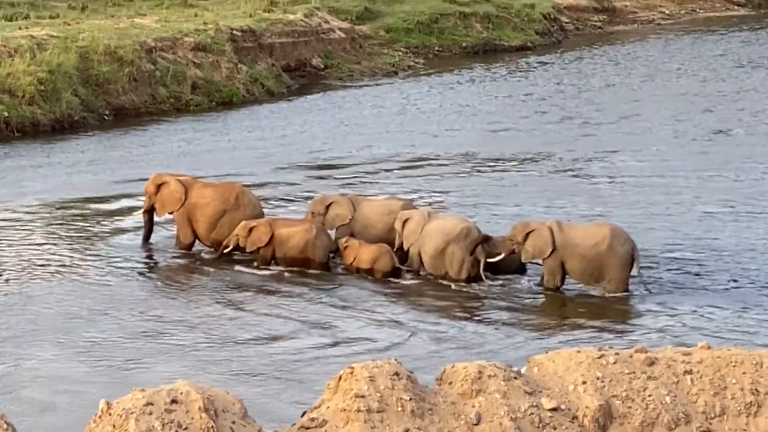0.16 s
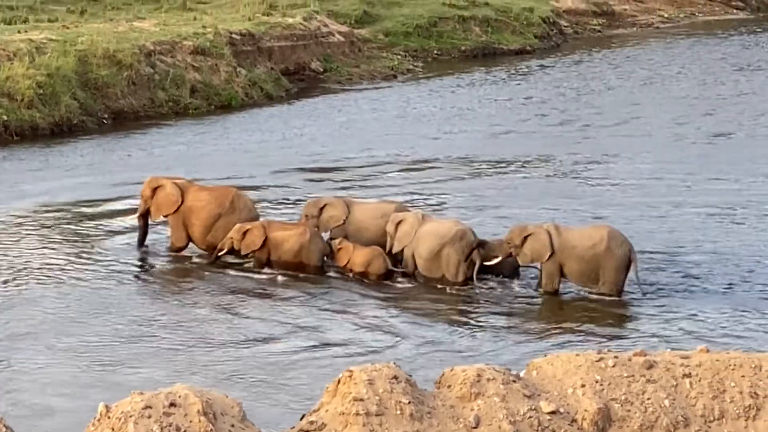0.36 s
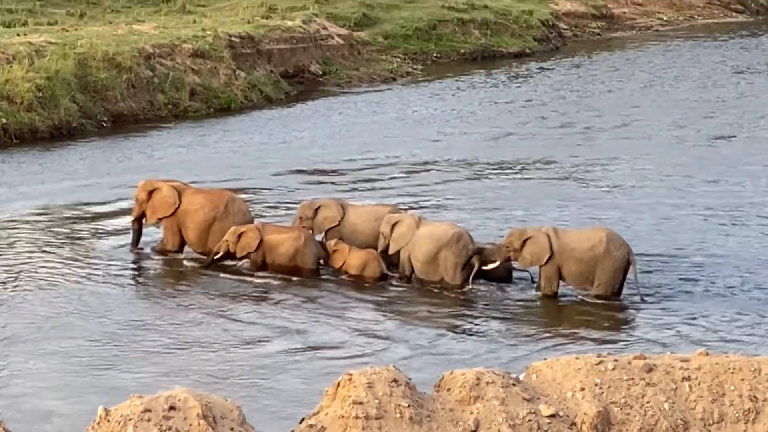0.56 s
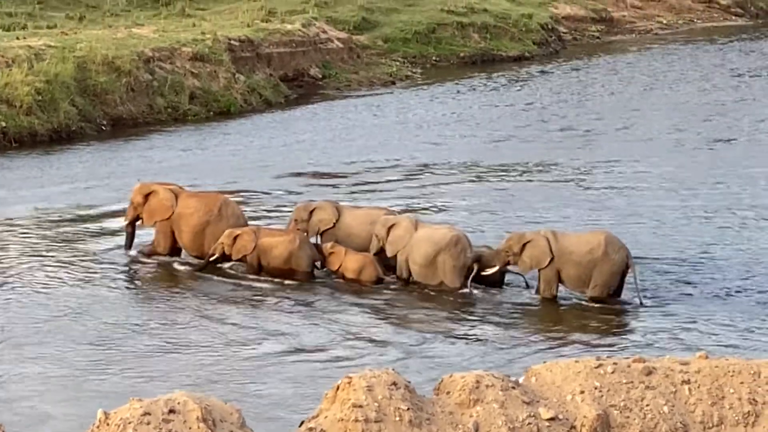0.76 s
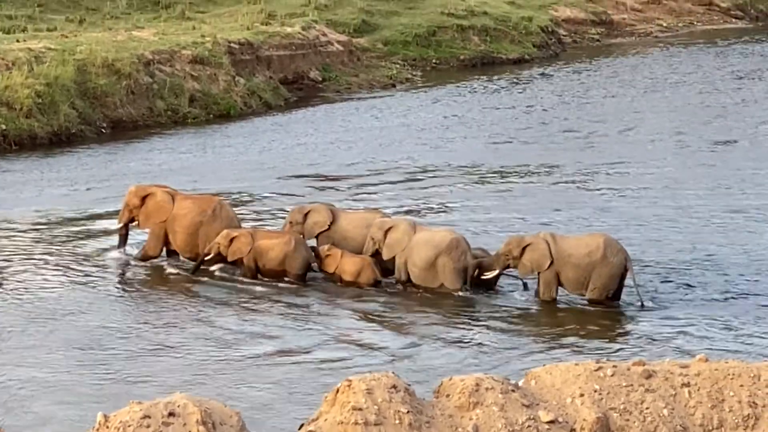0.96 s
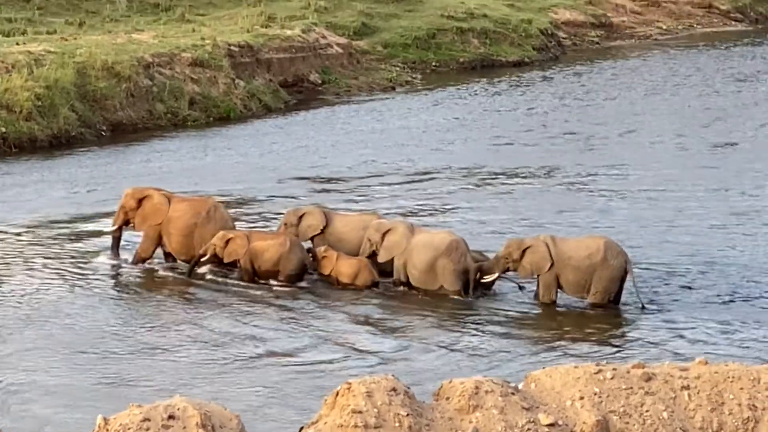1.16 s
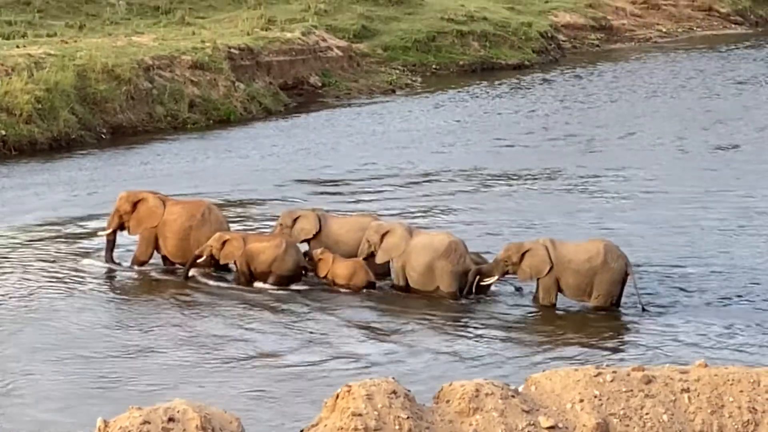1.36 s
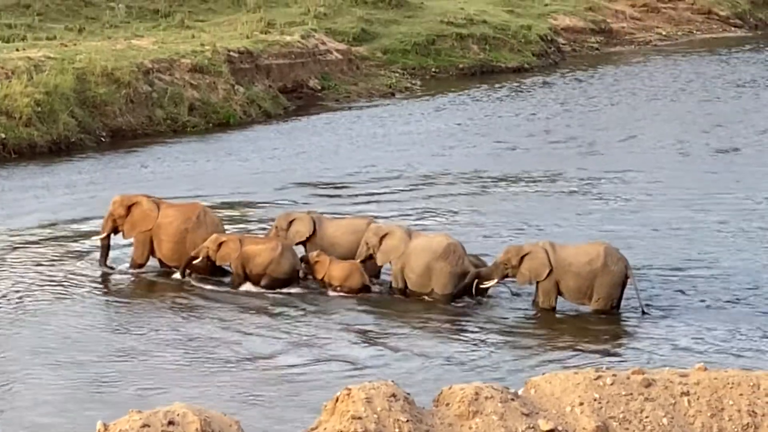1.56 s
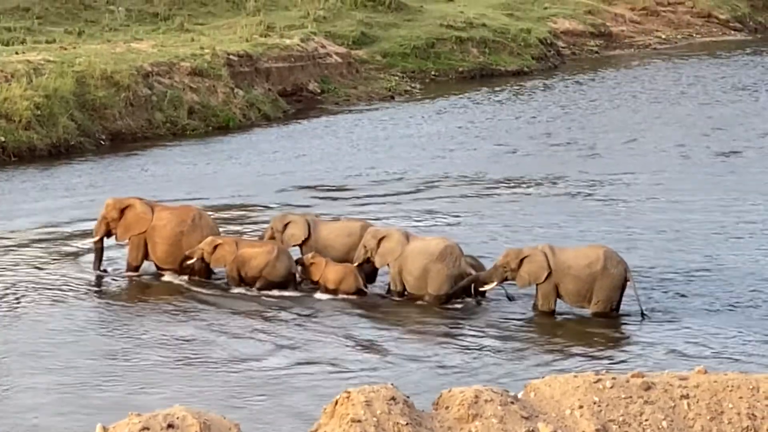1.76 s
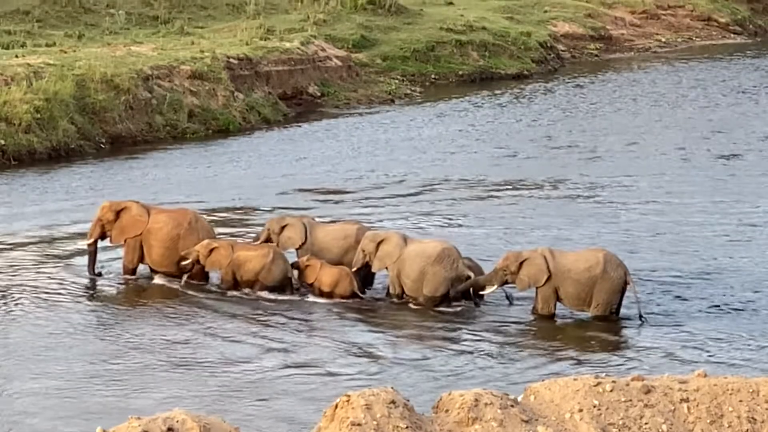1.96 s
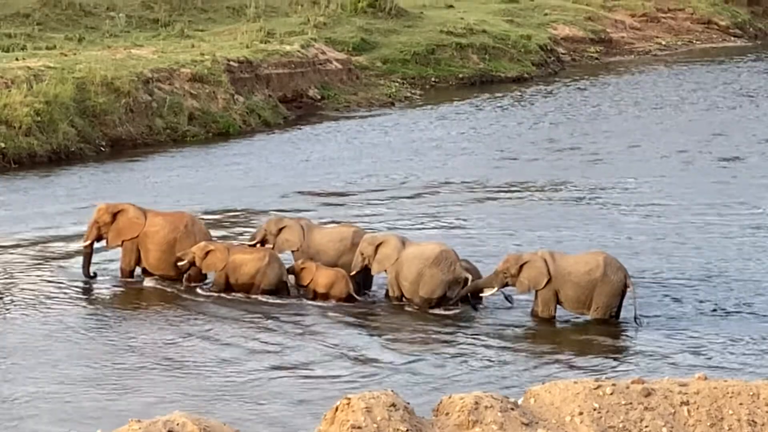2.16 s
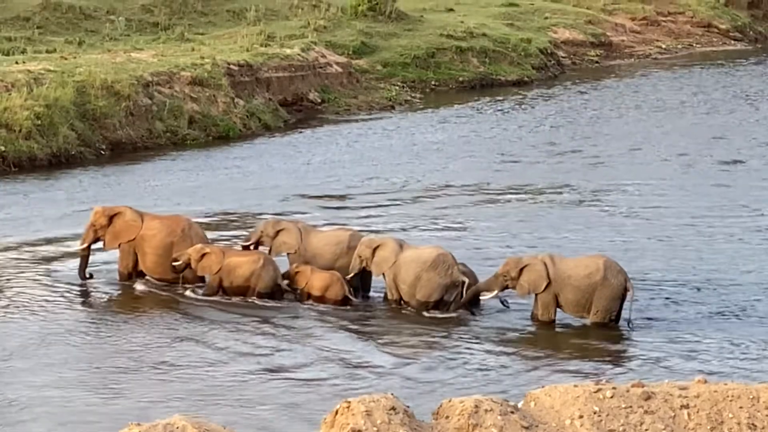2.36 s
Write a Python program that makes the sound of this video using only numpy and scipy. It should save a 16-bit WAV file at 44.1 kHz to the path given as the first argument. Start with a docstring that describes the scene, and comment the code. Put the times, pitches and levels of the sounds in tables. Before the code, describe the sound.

Deep, uneven wind gusts thump and rumble on the microphone, strongest early then weakening, while one bird repeats a short rising whistle and others chirp and trill over soft river hiss and thin insect tones outdoors.

```python
"""A river hisses under thin, steady insect tones and one short bird note; then wind buffets the microphone.
The river is coloured noise; the insects are wavering sines over a band of hiss; rustles, ticks and a snap
are bright noise close by. One bird repeats a rising whistle, others add a slur, short notes and a trill,
all gliding sines with a short echo. The wind grunts in deep noise bursts, broad buffets and sharp single eddies."""
import sys
import numpy as np
from scipy import signal
from scipy.fft import rfft, irfft
from scipy.io import wavfile
from scipy.ndimage import uniform_filter1d

SR = 44100
rng = np.random.default_rng(int(sys.argv[2]) if len(sys.argv) > 2 else 0)


def output_pcm(signal):
    """Save a mono or channel-first signal as 16-bit PCM at the path in sys.argv[1].

    Samples are clipped to [-1, 1] before scaling.
    """
    pcm = np.clip(np.atleast_2d(signal).T, -1, 1) * 32767
    wavfile.write(sys.argv[1], SR, np.round(pcm).astype(np.int16))


N = 105840  # samples, 2.4 s


def amp(db):
    """Turn decibels into a linear gain."""
    return 10 ** (np.asarray(db) / 20)


def rms_one(x):
    """Scale a signal to an rms of 1."""
    return x / np.sqrt(np.mean(x ** 2) + 1e-20)


def in_time(rows, start=0):
    """Draw straight lines through the rows: one curve per column, the first column being seconds after start."""
    seconds, *columns = np.transpose(rows)
    t = np.arange(N) / SR - start
    return [np.interp(t, seconds, column) for column in columns]


def band(x, low_hz, high_hz, order=2):
    """Keep only the band between two edges."""
    edges = [low_hz, min(high_hz, .45 * SR)]
    return signal.sosfilt(signal.butter(order, edges, "band", fs=SR, output="sos"), x)


def low_pass(hz, order=2):
    """Design a filter that keeps what lies below hz."""
    return signal.butter(order, hz, fs=SR, output="sos")


def drift(corner_hz):
    """Random wandering of rms 1: white noise through two equal one-pole low-passes."""
    r = np.exp(-2 * np.pi * corner_hz / SR)
    wander = signal.lfilter([1], [1, -2 * r, r * r], rng.standard_normal(N + SR))
    return rms_one(wander[SR:])  # the first second lets the filter settle


def coloured(spectrum, patchy_db):
    """Noise shaped to a spectrum and set to rms 1, made to flicker in level."""
    hz, db = np.transpose(spectrum)
    bin_hz = np.arange(N // 2 + 1) * SR / N
    gain = amp(np.interp(np.log(bin_hz + 1), np.log(hz), db))
    flicker = amp(patchy_db * drift(8.6))
    return flicker * rms_one(irfft(gain * rfft(rng.standard_normal(N)), N))


def tone(hz, db):
    """A sine that follows a pitch curve, at an rms level in dB."""
    phase = 2 * np.pi * np.cumsum(hz) / SR
    return np.sqrt(2) * amp(db) * np.sin(phase)


def spell(start, length, edge):
    """A swell from nothing to 1 and back, and the share of the way through it."""
    u = np.clip((np.arange(N) / SR - start) / length, 0, 1)
    return np.abs(np.sin(np.pi * u)) ** edge * (u > 0) * (u < 1), u


def evened(x, span_s=.0495):
    """Divide a signal by its own running rms, so that its level stays near 1."""
    return x / np.sqrt(uniform_filter1d(x ** 2, int(span_s * SR)) + 1e-12)


def burst(start, db, t60, low_hz, top_hz=12500):
    """A puff of noise that falls 60 dB in t60 seconds, then passes a band filter."""
    out, i = np.zeros(N), int(start * SR)
    n = min(SR // 20, N - i)
    t = np.arange(SR // 20) / SR
    puff = rng.standard_normal(SR // 20) * amp(db - 60 * t / t60)
    out[i:i + n] = band(puff, low_hz, top_hz)[:n]
    return out


# Colour of the water's hiss. Each row: frequency in Hz, relative density in dB per Hz.
RIVER_COLOUR = [(120, -32), (200, -5), (400, -10), (550, -6.5), (850, -8), (1300, -7), (1950, -4),
                (2700, -10), (3100, -13.5), (3900, -16.5), (5800, -30), (7500, -31.5), (11500, -35),
                (13000, -42.5), (15000, -34.5)]
RIVER_DB, RIVER_PATCHY_DB = -47.5, 1.62  # level, depth of flicker


def river():
    """The steady hiss of water: coloured noise with a slight flicker in level."""
    return amp(RIVER_DB) * coloured(RIVER_COLOUR, RIVER_PATCHY_DB)


# Thin insect tones. Each row: pitch in Hz, rms level in dB around which it wavers.
DRONES = [(1733.3, -61), (1974, -54.5), (2214.3, -63.5)]
# Swell of the far chorus. Each row: time in seconds, level in dB.
CHORUS_SWELL = [(0, -58.5), (1.2, -58.5), (1.5, -54.5), (1.97, -60.5)]
CHORUS_LOW_HZ, CHORUS_TOP_HZ = 4034, 4940
DRONE_WAVER_DB, DRONE_WAVER_HZ = 1.5, 8  # depth, corner of the random waver


def insects():
    """Sines at fixed pitch that waver in level, over far insects blurred into a band of hiss."""
    level_db, = in_time(CHORUS_SWELL)
    hiss = band(rng.standard_normal(N), CHORUS_LOW_HZ, CHORUS_TOP_HZ, order=3)
    out = amp(level_db) * rms_one(hiss)
    for hz, db in DRONES:
        out += tone(np.full(N, hz), db + DRONE_WAVER_DB * drift(DRONE_WAVER_HZ))
    return out


# Spells of high rustle. Each row: start in seconds, length in seconds, level in dB.
RUSTLES = [(0, 0.11, -64), (0.45, 0.019, -64), (0.861, 0.063, -56), (1.18, 0.046, -61.5),
           (1.782, 0.12, -62.5), (2.381, 0.015, -64)]
# Colour of the rustle. Each row: frequency in Hz, relative density in dB per Hz.
RUSTLE_SPECTRUM = [(5500, -36), (8000, -6), (11500, -3.5), (13000, -24), (14800, -6)]
# Small ticks. Each row: start in seconds, noise level at the onset in dB before the band filter.
TICK_ONSETS = [(.6804, -50), (1.2027, -51), (1.2825, -53), (1.3633, -52)]
# One broad snap, a single row: start in seconds, onset level in dB before the band filter,
# 60 dB decay in seconds, low band edge in Hz.
BROAD_SNAP = (.9668, -33.5, .022, 1600)
TICK_T60_S, TICK_LOW_HZ = .012, 7500


def rustle():
    """High rustle close by from swelling coloured noise, with ticks and one snap from fast-dying puffs."""
    level = sum(amp(db) * spell(start, length, .45)[0] for start, length, db in RUSTLES)
    ticks = sum(burst(start, db, TICK_T60_S, TICK_LOW_HZ) for start, db in TICK_ONSETS)
    return level * coloured(RUSTLE_SPECTRUM, patchy_db=2.5) + ticks + burst(*BROAD_SNAP)


# The repeated whistle. Each row: start in seconds, level in dB added to the shape, stretch in time as a factor.
WHISTLE_CALLS = [(0.58, -37.5, 0.95), (1.364, -40, 1.03), (2.147, -43, 1.08)]
# Shape of one whistle. Each row: seconds after the start before stretching, pitch in Hz, relative level in dB.
WHISTLE_SHAPE = [(0, 1782, -29), (0.012, 1756, -8.5), (.05, 1785, -11.5), (0.068, 1803, 0.5),
                 (0.165, 1885, 0.5), (0.19, 1950, -0.5), (.198, 1960, -47), (0.208, 1802, -10.5),
                 (0.25, 1735, -11.5), (.29, 1824, -20)]


def whistles():
    """One bird's rising whistle: a sine that climbs, breaks off and drops to a short lower ending."""
    t, out = np.arange(N) / SR, np.zeros(N)
    for start, db, stretch in WHISTLE_CALLS:
        hz, shape_db = in_time(np.multiply(WHISTLE_SHAPE, [stretch, 1, 1]), start)
        sounding = (t > start) * (t < start + stretch * WHISTLE_SHAPE[-1][0])
        out += tone(hz, shape_db + db) * sounding
    return out


NOTE_ROUGH = .3  # depth of the random level roughness, as a share of the note
# A second bird's falling slur into a held note. Each row: time in seconds, pitch in Hz, level in dB.
FALLING_SLUR = [(1.085, 3150, -54), (1.135, 3130, -60), (1.15, 2950, -50), (1.175, 2700, -55.5),
                (1.196, 2576, -42), (1.232, 2548, -38), (1.246, 2508, -40), (1.308, 2538, -38.5),
                (1.335, 2544, -54)]


def slur():
    """A second bird: a sine slides down into a held note, its level roughened."""
    t = np.arange(N) / SR
    sounding = (t > FALLING_SLUR[0][0]) * (t < FALLING_SLUR[-1][0])
    return tone(*in_time(FALLING_SLUR)) * (1 + NOTE_ROUGH * drift(56)) * sounding


# Short notes of further birds. Each row: start in seconds, length in seconds, first, middle and last pitch in Hz,
# level in dB, random pitch blur in Hz.
SHORT_NOTES = [(0, 0.036, 1930, 1910, 1860, -46, 72), (0.396, 0.038, 4750, 4970, 4780, -57.5, 20),
               (.69, .047, 4900, 5100, 5200, -61, 30), (0.785, 0.022, 4800, 5300, 5130, -54, 10),
               (0.805, 0.027, 5130, 5430, 4700, -52, 10), (0.878, 0.05, 4750, 5380, 5150, -54, 25),
               (1.645, .036, 3720, 3730, 3700, -50.5, 14), (1.69, 0.036, 3660, 3410, 3600, -45, 10),
               (1.742, 0.034, 3600, 3330, 3330, -44, 10), (1.79, 0.04, 3560, 3230, 3400, -49, 25),
               (1.843, 0.034, 3420, 3170, 3150, -47, 15), (1.885, 0.036, 3350, 3170, 3350, -51, 40),
               (1.753, 0.055, 6450, 6600, 7000, -62, 160), (1.968, 0.1, 6800, 6740, 6700, -62.5, 50),
               (2.064, 0.082, 4500, 3550, 2820, -53, 380), (2.24, 0.036, 4500, 4730, 5050, -52, 150),
               (2.28, .078, 2380, 2890, 3080, -52, 15)]


def short_notes(rough, blur):
    """Further birds: brief sines swell and fade, each bending in pitch along a parabola."""
    out = np.zeros(N)
    for start, length, first, middle, last, db, blur_hz in SHORT_NOTES:
        swell, u = spell(start, length, .6)
        # the parabola meets the three pitches at the start, middle and end
        hz = first * (1 - u) * (1 - 2 * u) + 4 * middle * u * (1 - u) + last * u * (2 * u - 1)
        out += rough * tone(hz + blur_hz * blur, db) * swell
    return out


# A fast trill, a single row: start in seconds, length in seconds, first and last centre pitch in Hz, level in dB.
FAST_TRILL = (1.38, .29, 2960, 2760, -46)
TRILL_PER_S, TRILL_DROP_HZ, TRILL_BLUR_HZ = 38, 280, 104  # pulse rate, fall in each pulse, random blur


def trill(rough, blur):
    """A rapid run of sine pulses, each falling in pitch while the whole run sinks."""
    start, length, first, last, db = FAST_TRILL
    swell, u = spell(start, length, .8)
    beat = (np.arange(N) / SR - start) * TRILL_PER_S % 1
    hz = first + (last - first) * u + TRILL_DROP_HZ * (.5 - beat) + TRILL_BLUR_HZ * blur
    return rough * tone(hz, db) * swell * np.sin(np.pi * beat)


ECHO_DB, ECHO_T60_S = -7.5, .5


def birds():
    """All the birds, with a short diffuse echo off the banks made by a decaying noise tail."""
    calls = whistles() + slur()
    rough, blur = 1 + NOTE_ROUGH * drift(200), drift(160)
    calls += short_notes(rough, blur) + trill(rough, blur)
    t = np.arange(SR // 2) / SR
    tail = rng.standard_normal(SR // 2) * amp(-60 * t / ECHO_T60_S)
    echo = signal.fftconvolve(calls, tail / np.sqrt(np.sum(tail ** 2)))[:N]
    return calls + amp(ECHO_DB) * echo


# Gusts on the microphone. Each row: time in seconds, level of the throb in dB.
GUST_LEVELS = [(0, -51), (.13, -48.5), (.21, -23.5), (.26, -32), (.29, -21), (.41, -13.5), (.45, -24.5),
               (.48, -20), (.53, -31), (.6, -26.5), (.63, -17), (.69, -25), (.755, -26.5), (.79, -42),
               (.87, -27), (.92, -19.5), (.97, -29.5), (1.01, -19), (1.05, -38), (1.14, -43), (1.18, -31.5),
               (1.28, -18), (1.31, -39), (1.35, -23), (1.39, -40), (1.42, -23.5), (1.47, -35.5), (1.6, -30),
               (1.67, -41.5), (1.72, -31), (1.79, -32), (1.83, -21.5), (1.865, -32), (1.9, -25.5),
               (1.97, -36), (2.02, -39.5), (2.055, -31), (2.105, -47), (2.135, -36), (2.23, -48.5),
               (2.4, -37)]
THROB_LOW_HZ, THROB_TOP_HZ = 43, 91.9


def throb():
    """The deep body of the wind: a low band of noise, evened out, then driven by the gusts."""
    level_db, = in_time(GUST_LEVELS)
    low_noise = band(rng.standard_normal(N + SR), THROB_LOW_HZ, THROB_TOP_HZ)[SR:]
    return amp(level_db) * evened(low_noise)


# Rough broad bursts on top of the throb. Each row: start in seconds, length in seconds, level in dB,
# reach (low-pass corner) in Hz.
ROUGH_BUFFETS = [(0.169, 0.051, -30, 180), (.27, 0.017, -33.5, 170), (0.364, 0.061, -14, 200),
                 (0.467, 0.037, -32, 320), (0.61, 0.086, -23.5, 320), (0.354, 0.034, -21, 500),
                 (0.86, 0.085, -27, 210), (0.92, 0.095, -28, 240), (1.247, 0.038, -31.5, 170),
                 (1.396, 0.02, -28.5, 185), (1.812, 0.13, -43.5, 118)]
BUFFET_LOW_HZ, BUFFET_TOP_HZ = 79.5, 1032
LUMPY_DB, LUMP_HZ = 3, 13.3  # depth and corner of the random lumps in level
BUFFET_EDGE, BRIGHT_EDGE = .45, 2.6  # powers: shape of the swell, extra pointedness of the bright part


def buffets():
    """Rough eddies: lumpy low-passed noise whose bright part peaks more sharply than its dull part."""
    eddies = band(rng.standard_normal(N + SR), BUFFET_LOW_HZ, BUFFET_TOP_HZ)[SR:]
    lumps = amp(LUMPY_DB * drift(LUMP_HZ))
    out = np.zeros(N)
    for start, length, db, reach_hz in ROUGH_BUFFETS:
        rough = evened(signal.sosfilt(low_pass(reach_hz), eddies))
        dull = signal.sosfiltfilt(low_pass(reach_hz), rough)
        bright = rough - dull
        swell, _ = spell(start, length, BUFFET_EDGE)
        out += amp(db) * swell * lumps * (dull + swell ** BRIGHT_EDGE * bright)
    return out


# Sharp single eddies. Each row: time of the peak in seconds, peak level in dB, sharpness in Hz.
EDDY_POPS = [(0.3208, -7.5, 420), (0.4053, -19, 380), (0.4741, -20, 560), (0.8952, -21, 520),
             (.9765, -27.5, 663)]


def pops():
    """Sharp single eddies: one narrow downward pressure pulse each, a bell curve with slight rebounds."""
    out = np.zeros(N)
    for peak_s, db, hz in EDDY_POPS:
        turn = (np.arange(N) / SR - peak_s) * hz * np.pi
        out -= amp(db) * (1 - .18 * turn ** 2) * np.exp(-turn ** 2)
    return out


def wind():
    """Wind on the microphone: throb and buffets with their top rolled off, plus the sharp eddies."""
    return signal.sosfilt(low_pass(BUFFET_TOP_HZ, order=4), throb() + buffets()) + pops()


def scene():
    """Sum all the sources of the river bank into one channel."""
    return mix()[None]


def mix():
    """Add the wind and birds to the insects, river and rustle."""
    gusty, calling, droning = wind(), birds(), insects()
    return gusty + calling + droning + river() + rustle()


LOW_CUT_HZ, OVERLOAD = 38, .8  # bass corner, ceiling of the rounded peaks
TOP_STOP_HZ = 16150  # from here up the sound is at least 60 dB down


def record(dry):
    """The deepest bass is cut, peaks are rounded, the top is cut."""
    low_cut = signal.butter(2, LOW_CUT_HZ, "high", fs=SR, output="sos")
    thin = signal.sosfilt(low_cut, dry)
    rounded = OVERLOAD * np.tanh(thin / OVERLOAD)
    return signal.sosfilt(signal.cheby2(14, 60, TOP_STOP_HZ, fs=SR, output="sos"), rounded)


dry = scene()
out = record(dry)
output_pcm(out)
```